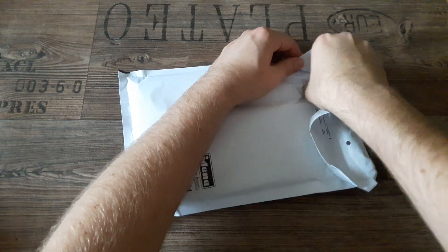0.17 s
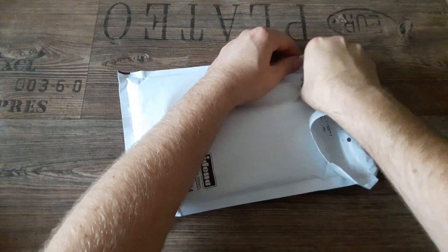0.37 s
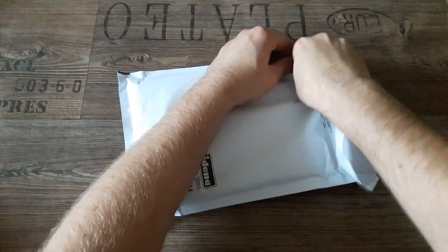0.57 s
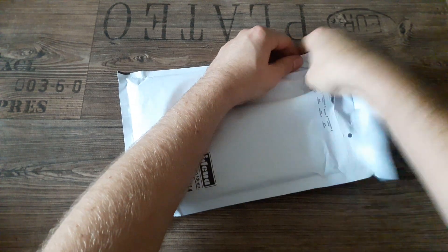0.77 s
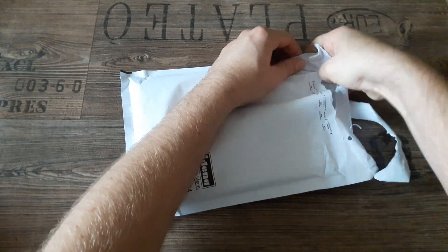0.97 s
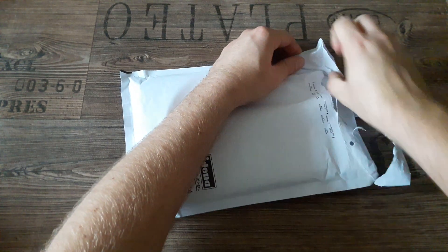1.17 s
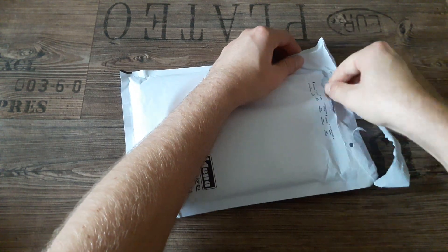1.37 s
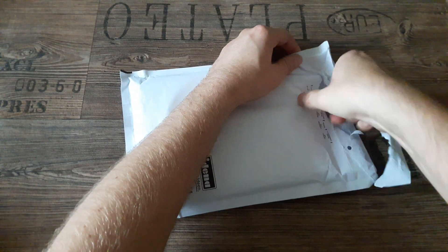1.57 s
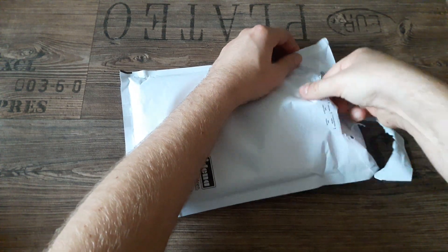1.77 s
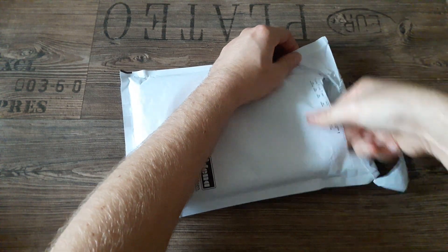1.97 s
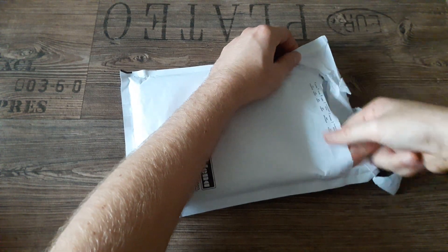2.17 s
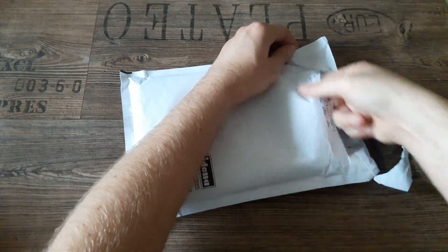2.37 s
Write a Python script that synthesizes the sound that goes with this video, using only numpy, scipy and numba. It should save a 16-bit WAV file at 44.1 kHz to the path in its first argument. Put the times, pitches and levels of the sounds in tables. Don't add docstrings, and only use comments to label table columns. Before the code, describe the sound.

A padded paper mailer is torn open on a wooden table, close to a phone in a small room. Crisp snaps, crinkles and bright film ticks come in irregular bursts from 0 to 1.2 seconds, thin out until about 1.7, then surge into the loudest dense crackling at 1.75-2.15. A brief lull ends with a sharp crack near 2.39. Soft dull bumps, short room tail, faint hiss.

```python
import sys
import numpy as np
from scipy import signal
from scipy.io import wavfile
from numba import njit

SR = 44100
rng = np.random.default_rng(int(sys.argv[2]) if len(sys.argv) > 2 else 0)


def boost_factor(decibels):
    exponent = np.asarray(decibels, float) / 20
    return 10 ** exponent


def pcm_store(signal):
    levels = np.round(np.clip(np.atleast_2d(signal), -1, 1) * 32767)
    wavfile.write(sys.argv[1], SR, levels.astype(np.int16).T)


N = 106369

# (frequency [Hz], level [dB])
PAPER_RESPONSE = [(300, -22.5), (500, -4.5), (900, -4), (1400, 2), (2100, 6.5), (3000, 2.5), (5000, 4.5),
                  (7000, -3.5)]
FILM_HZ, FILM_CYCLES, FILM_BURST_S = (6170, 18000), 2.4, 0.001
PAD_HZ, PAD_CYCLES = (160, 407), 2.87
EDGE_HZ, SIDE_CYCLES = (1800, 6500), 2.5
RING_LIFT_DB = 10.5
PAN_DB = -2.5


@njit
def rings(at, hz, decay, rise, size, n):
    y = np.zeros(n)
    for k in range(len(at)):
        first = int(np.ceil(at[k]))
        late = first - at[k]
        pole = 2j * np.pi * hz[k] - decay[k]
        ring, turn = size[k] * np.exp(pole * late), np.exp(pole)
        unrisen, rise_step = np.exp(-rise[k] * late), np.exp(-rise[k])
        end = int(6 / decay[k])
        for j in range(max(first, 0), min(first + end, n)):
            y[j] += ring.imag * (1 - unrisen) ** 2
            ring *= turn
            unrisen *= rise_step
    return y


def places(count, spread=1):
    return spread * rng.standard_normal((count, 2)).T


def grains(s, hz, cycles, db, place):
    lag_s, lag_spread_s, pan_spread_db, rise_cycles = 3e-5, 5e-5, 2.5, 0.45
    hz = np.clip(hz, 50, 0.45 * SR) / SR
    sign = np.where(rng.random(len(hz)) < 0.5, -1., 1.)
    half_lag = (lag_s + lag_spread_s * place[0]) * SR / 2
    half_pan_db = (PAN_DB + pan_spread_db * place[1]) / 2
    decay = np.log(10) * hz / cycles
    rise = hz / rise_cycles
    return np.array([rings(s * SR + port * half_lag, hz, decay, rise, sign * boost_factor(db + port * half_pan_db), N)
                     for port in (1, -1)])


def curve(table, hz, column=1):
    table = np.array(table)
    return np.interp(np.log(hz), np.log(table[:, 0]), table[:, column])


def cluster(s, db, edges_hz, cycles, spread_s, place, count, colour=False, scale=1):
    u = rng.random((len(s), count, 3))
    low, high = edges_hz
    hz = low * (high / low) ** u[..., 0] * scale
    db = db[:, None] - 6 * u[..., 1]
    if colour:
        db = db + curve(PAPER_RESPONSE, hz)
    at = s[:, None] - spread_s * np.log(1 - u[..., 2])
    return grains(at.ravel(), hz.ravel(), cycles, db.ravel(), np.repeat(place, count, axis=1))


def bands(length):
    # (frequency [Hz], likeness [0-1])
    likeness = [(30, 0.4), (100, 0.25), (300, 0.96), (600, 0.08), (4000, 0)]
    for hz in 32 * 2. ** np.arange(10):
        edges = [hz / np.sqrt(2), min(hz * np.sqrt(2), 0.45 * SR)]
        sos = signal.butter(2, edges, "bandpass", fs=SR, output="sos")
        mid, side = signal.sosfilt(sos, rng.standard_normal((2, length)))
        alike = np.clip(curve(likeness, hz), 0, 1)
        yield hz, np.sqrt((1 + alike) / 2) * mid + np.sqrt((1 - alike) / 2) * side * np.array([[1], [-1]])


def floor():
    # (frequency [Hz], level [dB per Hz])
    spectrum = [(18, -44), (30, -1.5), (303, -10), (404, -15), (12300, -24.5), (16000, -25.5)]
    air = sum(boost_factor(curve(spectrum, hz)) * band for hz, band in bands(N))
    return air / air.std() * boost_factor(-60)


def decaying(t, t60):
    return np.exp(-np.log(1000) * t / t60) * np.sqrt(2 * np.log(1000) / t60 / SR)


def room(x):
    # (frequency [Hz], level [dB], decay time T60 [s])
    walls = [(300, -13, 0.39), (1450, -6, 0.64), (4070, -4.5, 0.53), (9900, -8.5, 0.38)]
    t, tail = np.arange(SR // 2) / SR, 0
    early = boost_factor(-11) * decaying(t, t60=0.034) * np.clip(t / 0.00064, 0, 1)
    for hz, band in bands(len(t)):
        late = boost_factor(curve(walls, hz)) * decaying(t, curve(walls, hz, column=2)) * np.clip(t / 0.0044, 0, 1)
        tail = tail + band * (late + early)
    lean = boost_factor(np.array([[PAN_DB], [-PAN_DB]]) / 2)
    return signal.fftconvolve(x.mean(axis=0)[None], tail, axes=1)[:, :N] * lean


def bumps():
    # (time [s], level [dB], ring pitch [Hz])
    knocks = [(.015, -46, 198), (0.116, -39, 150), (.195, -40, 101), (.255, -42, 200), (.362, -35, 265),
              (.406, -38, 228), (0.451, -36.5, 172), (0.502, -39, 250), (0.604, -43, 80), (0.661, -41, 223),
              (0.681, -39, 60), (.738, -36, 236), (.835, -40, 81), (.885, -40, 180), (1.136, -38.5, 121),
              (1.358, -45, 229), (1.533, -36, 335), (1.615, -46, 130), (1.71, -46, 230), (1.82, -35, 148),
              (1.98, -43, 80.4), (2.021, -41, 112), (2.105, -44, 50), (2.147, -38, 108), (2.381, -39, 173)]
    s, db, hz = np.array(knocks).T
    return grains(s, hz, 1.58, db + RING_LIFT_DB, places(len(s), spread=0.4))


def ticks():
    # (time [s], peak [dB])
    film_ticks = [(0.2092, -28), (0.4773, -31), (0.5376, -28.5), (0.7233, -27), (1.124, -26.5),
                  (1.575, -37), (1.5844, -25), (1.757, -22)]
    # (time [s], level [dB])
    paper_cracks = [(0.069, -23), (.2686, -20), (0.4341, -20.5), (0.5087, -19), (.5648, -26), (0.7392, -28),
                    (1.107, -36), (1.3612, -31), (1.601, -17), (2.3851, -8)]
    s, db = np.array(film_ticks).T
    crack_s, crack_db = np.array(paper_cracks).T
    film = cluster(s + 0.00087, db + 1.5, (9000, FILM_HZ[1]), FILM_CYCLES, FILM_BURST_S, places(len(s)), count=8)
    paper = cluster(crack_s, crack_db, EDGE_HZ, SIDE_CYCLES, 0.000605, places(len(crack_s)), count=8)
    return film + paper


def crackle():
    # (start [s], length [s], level [dB], film brightness [dB])
    pulls = [(0, 0.035, -38.5, -29), (0.081, 0.083, -34, -20.5), (0.173, 0.11, -40.5, -20),
             (0.263, 0.057, -40.5, -14), (0.321, 0.051, -46.5, -15), (0.402, 0.023, -58, -36),
             (0.43, 0.034, -69, -28), (0.524, 0.2, -55, -7), (0.652, 0.039, -41, -18.5),
             (0.703, 0.18, -48.5, -18), (0.842, 0.036, -37.5, -21), (0.867, 0.085, -37.5, -19),
             (0.981, 0.074, -42.5, -18), (1.112, 0.084, -39, -16.5), (1.188, 0.022, -43.5, -15),
             (1.366, 0.018, -51, -23), (1.43, 0.053, -48.5, -9.5), (1.525, 0.075, -43, -28),
             (1.599, 0.035, -37, -22), (1.647, 0.13, -42, -12), (1.76, 0.045, -27.5, -13.5),
             (1.802, 0.042, -25.5, -13), (1.846, 0.027, -27, -19), (1.901, 0.14, -44.5, -9),
             (2.002, 0.037, -23.5, -19), (2.041, 0.081, -26.5, -11.5), (2.128, 0.024, -31, -6.5),
             (2.152, 0.049, -38.5, -9.5), (2.312, 0.04, -49.5, -14), (2.353, 0.1, -40, -10.5)]
    # (time [s], level [dB])
    held_paper = [(0, -49), (1.2, -57.5), (1.27, -50), (1.352, -68), (1.365, -52.5), (2.2, -54),
                  (2.3, -56.5), (2.41, -57)]
    # (time [s], level [dB])
    squeeze = [(.1, -54), (.3, -55), (.37, -46), (.48, -45), (.55, -57.5), (.87, -52), (1.07, -86),
               (1.13, -41), (1.25, -70), (1.7, -53.5), (1.84, -47), (1.96, -57), (2.02, -53), (2.28, -58),
               (2.41, -52)]
    paper_db, film_db, pad_db = -4, -2, -8
    paper_spread_db, film_spread_db, pad_spread_db = 3.2, 5.5, 2.3
    smear_s, film_smear_s, pull_edge_s = 0.001, 0.002, 0.008

    t = np.arange(N) / SR
    start, length, db, bright_db = np.array(pulls).T[..., None]
    on = np.clip(np.minimum(t - start, start + length - t) / pull_edge_s + 0.5, 0, 1)

    u = rng.random((7000, 2))
    s = u[:, 0] * N / SR
    strength = np.minimum(-np.log(1 - u[:, 1]), 2.6)
    place = places(len(s))
    paper_hz = (PAPER_RESPONSE[0][0], PAPER_RESPONSE[-1][0])
    paper = cluster(s, paper_spread_db * strength, paper_hz, 2.53, smear_s, place, count=3, colour=True)
    film = cluster(s, film_spread_db * strength, FILM_HZ, FILM_CYCLES, film_smear_s, place, count=3)
    pad = cluster(s[::9], pad_spread_db * strength[::9], PAD_HZ, PAD_CYCLES, smear_s,
                  0.4 * place[:, ::9], count=1)

    paper_level = boost_factor(np.interp(t, *np.array(held_paper).T)) + (on * boost_factor(db + paper_db)).sum(axis=0)
    film_level = (on * boost_factor(db + bright_db + film_db)).sum(axis=0)
    pad_level = boost_factor(np.interp(t, *np.array(squeeze).T) + pad_db)
    return paper / paper.std() * paper_level + film / film.std() * film_level + pad / pad.std() * pad_level


def snaps():
    # (time [s], peak [dB], ring pitch [Hz], film brightness [dB])
    first_tear = [(0.0701, -16.5, 3770, -9), (0.0797, -24.5, 1420, -26), (0.0851, -16, 1800, -3),
                  (0.0941, -18, 1490, -14), (0.1132, -24.5, 1280, -9), (0.1265, -17.5, 2270, 0),
                  (0.1479, -26, 885, -24), (0.1907, -25.5, 805, -26), (0.2244, -26, 1600, 0.5),
                  (0.2572, -24, 1060, 2), (0.2692, -13, 3400, -4), (0.2802, -20, 1270, -8),
                  (0.306, -35, 1530, -23), (0.3504, -31, 774, -22), (0.37, -22.5, 1920, -8),
                  (0.4112, -29, 980, -32), (0.435, -16, 2230, -35), (0.5102, -23.5, 685, -47),
                  (0.5653, -36.5, 1600, -8), (0.685, -24.5, 1440, -28), (0.7413, -16, 1850, -3.5),
                  (0.853, -24, 1460, -32), (0.8705, -13.5, 1710, -5), (0.9066, -16, 1860, -0.5),
                  (0.911, -30, 1820, -14.5), (0.9455, -23.5, 1890, 2), (0.9579, -18.5, 2610, -3.5)]
    # (time [s], peak [dB], ring pitch [Hz], film brightness [dB])
    reach_in = [(0.9991, -22, 1390, -14), (1.0144, -23, 2100, 1.5), (1.1088, -26.5, 1150, -31),
                (1.1177, -26, 1440, 3), (1.1463, -24.5, 1480, -26), (1.1671, -27, 1720, 4.5),
                (1.1944, -23, 1700, -23), (1.3622, -35, 1630, -29), (1.5378, -27.5, 1500, -4),
                (1.5586, -28.5, 2040, -30), (1.601, -20, 1860, -8), (1.7333, -16, 1960, 1),
                (1.7652, -21, 1810, -24), (1.776, -18.5, 2250, 0), (1.789, -13, 2240, -1),
                (1.8107, -9, 1900, -20), (1.8218, -11, 1890, -1), (1.8513, -21.5, 1780, -18),
                (1.8637, -16.5, 2040, -1.5), (2.0065, -11.5, 1590, -26), (2.012, -5, 1710, -14),
                (2.0172, -12, 1410, -7), (2.0298, -9.5, 1850, -3.5), (2.0828, -8, 1840, -6),
                (2.1307, -15.5, 1730, -1), (2.3266, -35.5, 594, -19), (2.3645, -22.5, 1400, -33),
                (2.3883, -15, 1340, -10.5)]
    # (time [s], peak [dB], ring pitch [Hz], film brightness [dB])
    small_creases = [(.1725, -25, 1850, -17), (.502, -37, 610, -30), (.6565, -31, 1530, -11),
                     (.663, -30, 800, -6), (.668, -32, 1500, -18), (.8155, -38, 1280, -20),
                     (.926, -23, 1900, -12), (1.2625, -39, 2100, -19), (1.4335, -30, 1980, -2),
                     (1.4665, -37, 2430, -20), (1.5095, -34.5, 1320, -20), (1.5425, -22, 2560, -23),
                     (1.548, -42, 2010, -20), (1.562, -30, 2000, -20), (1.612, -25, 1780, -18),
                     (1.6165, -28.5, 1940, -12), (1.627, -28.5, 1800, -18), (1.7312, -22, 2260, -5),
                     (1.798, -25, 1270, -11), (1.804, -25, 1540, -14), (1.828, -13, 1220, -27),
                     (1.836, -28, 1900, -12), (1.848, -12.5, 1480, -14), (1.8555, -21.5, 1180, -15),
                     (1.9775, -34, 1880, -15), (1.984, -26, 1090, -18), (2.0715, -19, 1620, -18),
                     (2.09, -17.5, 1690, -14), (2.093, -19, 1820, -10), (2.1025, -13.5, 1360, -14),
                     (2.109, -20, 1470, -18), (2.1145, -24, 1830, -16), (2.343, -32, 695, -25),
                     (2.373, -34, 1300, -20), (2.392, -29, 1500, -16), (2.4095, -24.5, 1800, -6)]
    s, db, hz, bright_db = np.array(list(first_tear) + list(reach_in) + list(small_creases)).T
    s = s - 0.8 / hz
    place, pitch = places(len(s)), hz[:, None]
    main = grains(s, hz, 2, db + RING_LIFT_DB, place)
    side = cluster(s, db - 1, (0.67, 2.26), SIDE_CYCLES, 0.000464, place, count=3, colour=True, scale=pitch)
    edge = cluster(s, db + 1 + bright_db / 2, EDGE_HZ, SIDE_CYCLES, 0.000412, place, count=5)
    after = cluster(s, db - 5, (0.59, 2.28), SIDE_CYCLES, 0.003, place, count=8, scale=pitch)
    film = cluster(s, db + bright_db - 1.5, FILM_HZ, FILM_CYCLES, FILM_BURST_S, place, count=10)
    thump = cluster(s, db - 25.5, PAD_HZ, PAD_CYCLES, 0.00169, place, count=2)
    return main + side + edge + after + film + thump


def scene():
    mailer = snaps() + ticks() + crackle() + bumps()
    return mailer + room(mailer) + floor()


def peak(x, hz, width_hz, db):
    return x + signal.lfilter(*signal.iirpeak(hz, hz / width_hz, fs=SR), x) * (boost_factor(db) - 1)


def band_limit(x):
    return signal.sosfilt(signal.butter(12, 16980, fs=SR, output="sos"), x)


def record(dry):
    x = peak(dry, hz=9500, width_hz=5000, db=6.5 * np.array([[1], [-1]]))
    x = peak(x, hz=13000, width_hz=3000, db=4)
    x = signal.sosfilt(signal.butter(2, 157, "highpass", fs=SR, output="sos"), x)
    x = signal.sosfilt(signal.ellip(8, 0.2, 60, 15900, fs=SR, output="sos"), x) - 0.0006
    return band_limit(x)


dry = scene()
out = record(dry)
pcm_store(out)
```